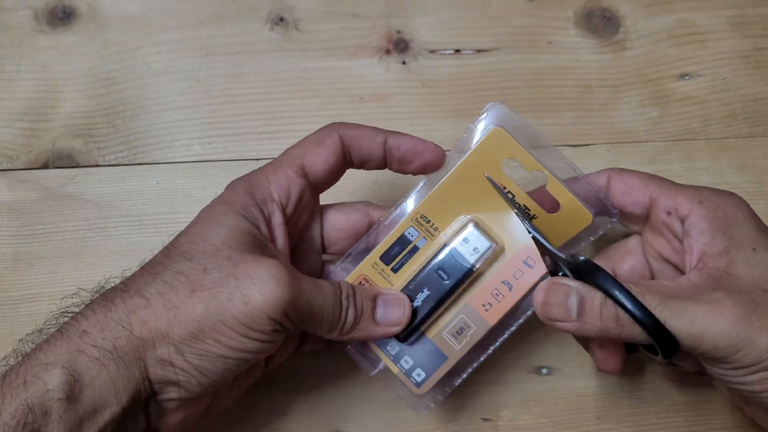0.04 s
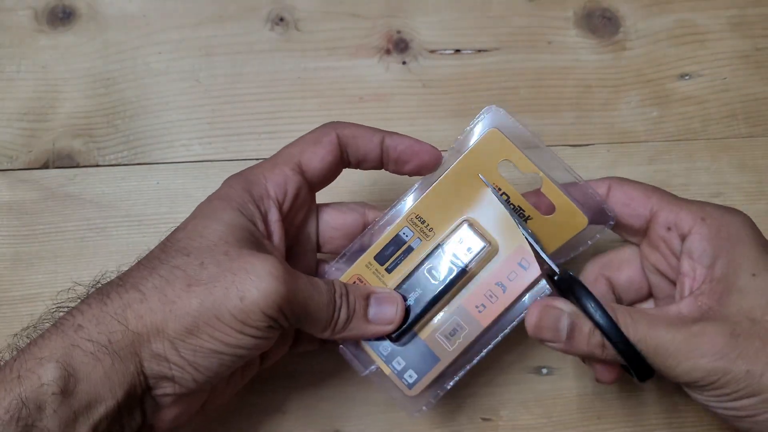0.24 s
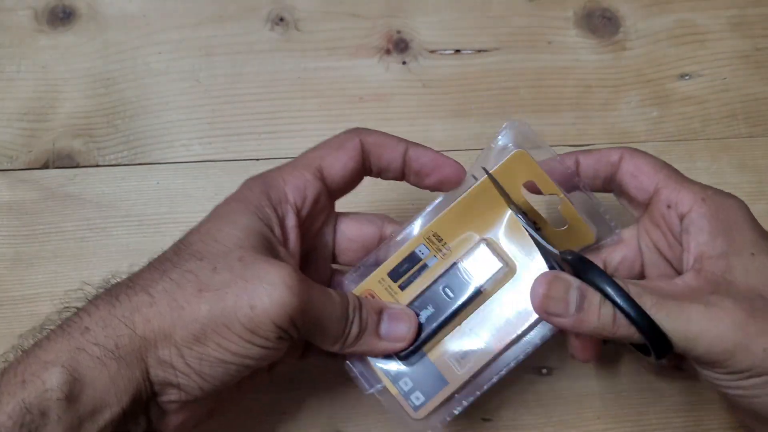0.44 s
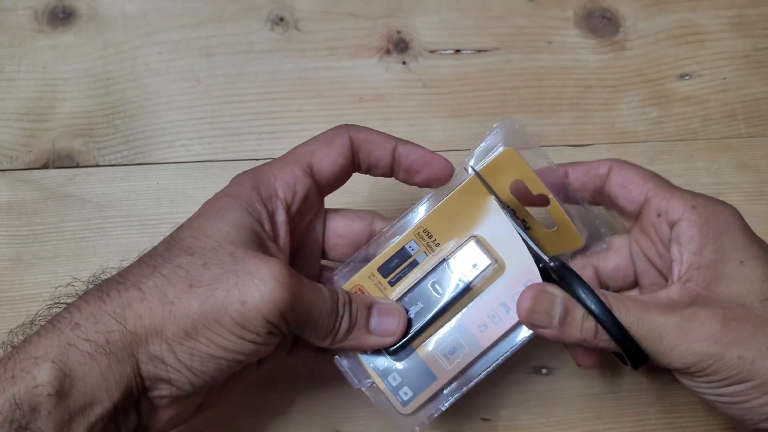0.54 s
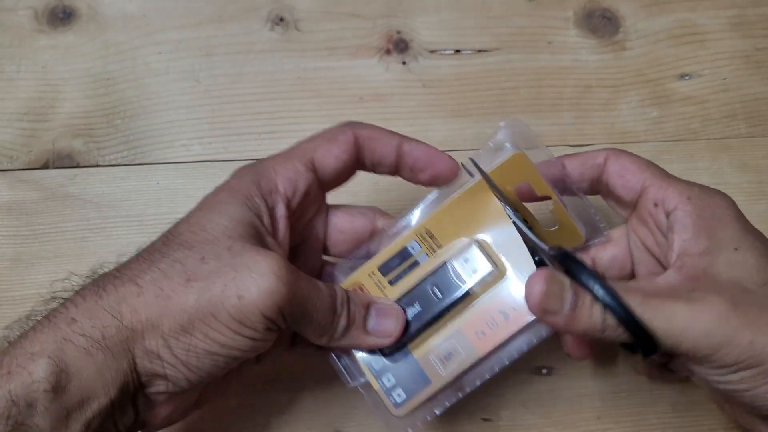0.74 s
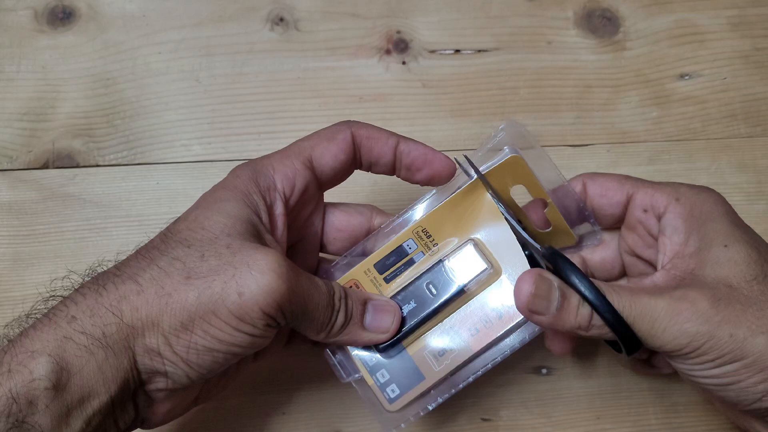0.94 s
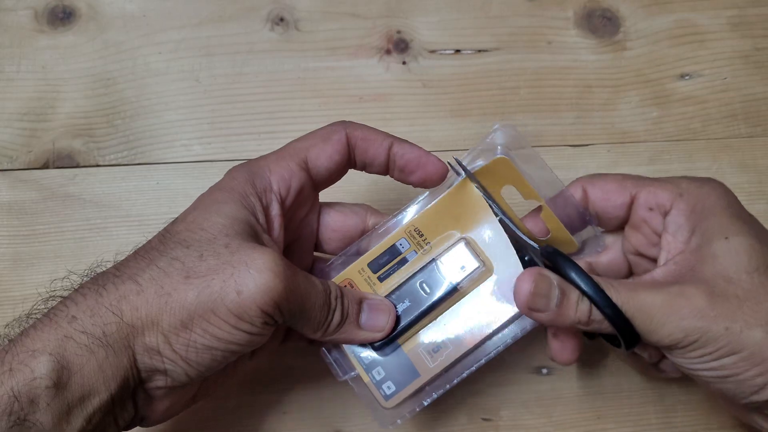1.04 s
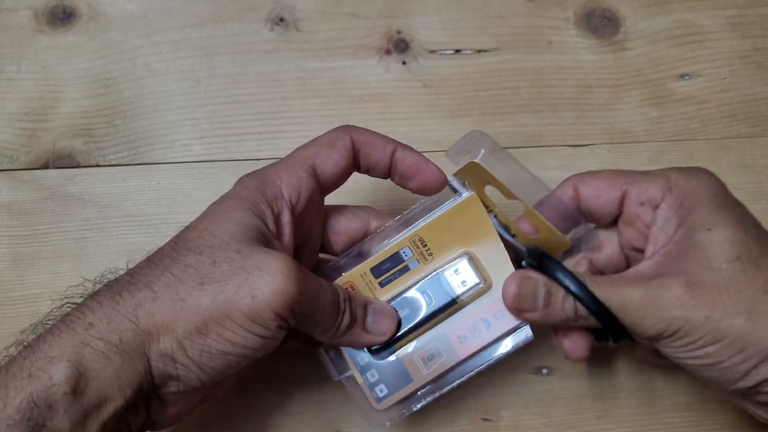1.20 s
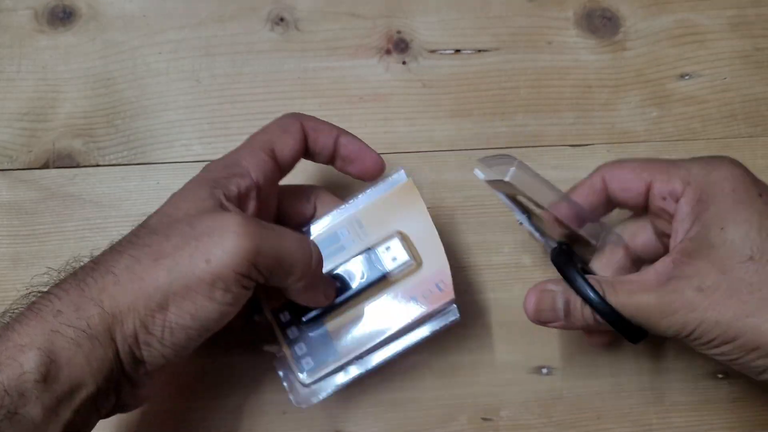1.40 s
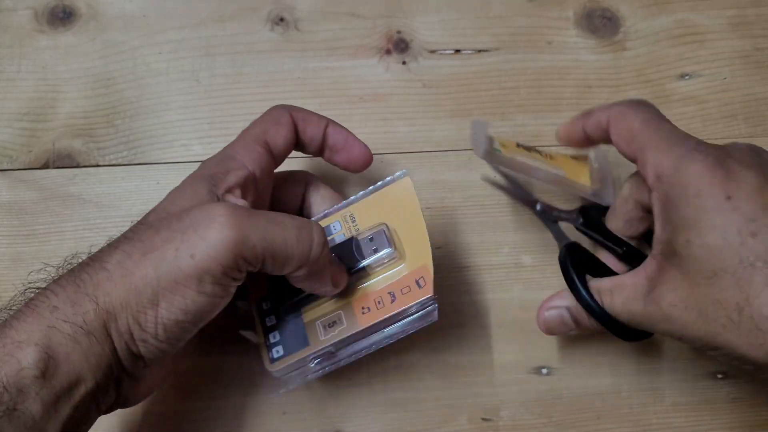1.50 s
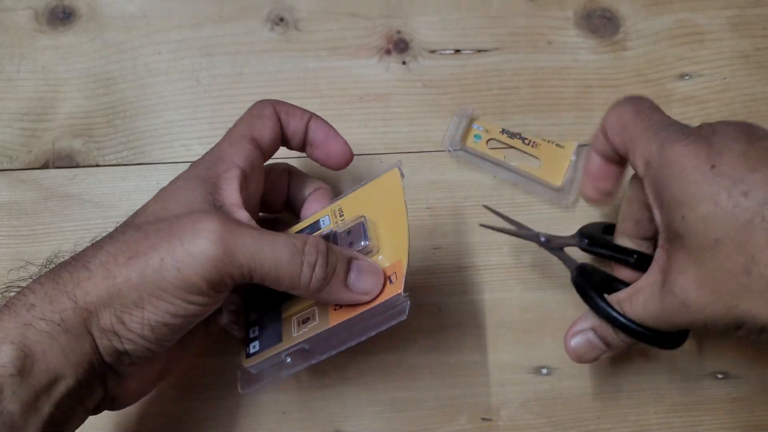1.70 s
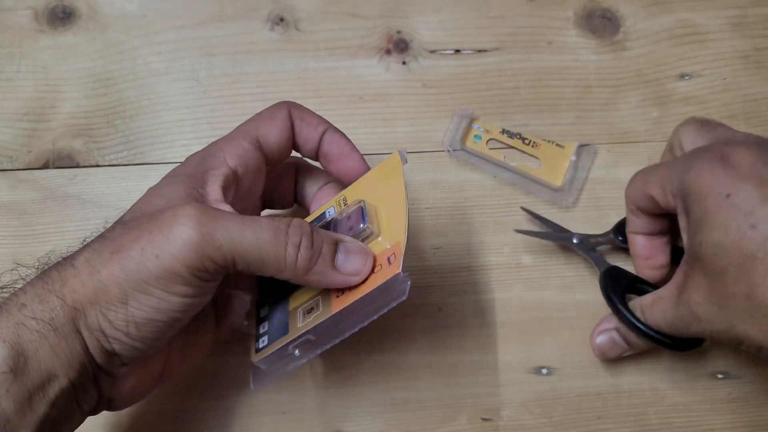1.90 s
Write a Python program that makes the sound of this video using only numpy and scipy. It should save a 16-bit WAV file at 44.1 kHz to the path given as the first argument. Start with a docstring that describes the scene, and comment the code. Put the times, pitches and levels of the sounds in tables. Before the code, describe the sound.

Scissors cut stiff clear plastic packaging with sharp cracks, snapping shut before the offcut clacks onto wood.

```python
"""Small room: scissors cut the top off a stiff plastic blister pack, close above a wooden table.
Four cracks are millisecond runs of filtered noise grains, with damped modes of the sheet and a room tail.
The blades snap shut with damped steel modes, a noise shiver and a low jolt; the offcut clacks and thuds.
Noise bursts make the pack's ticks and knocks, swelling noise the scrapes, strains and squeak.
A faint rustle, a low noise rumble and a steady hum lie beneath."""
import sys
import numpy as np
from scipy import signal
from scipy.fft import rfft, irfft
from scipy.io import wavfile
from scipy.ndimage import uniform_filter1d

SR = 44100
rng = np.random.default_rng(int(sys.argv[2]) if len(sys.argv) > 2 else 0)


def bounce(signal):
    """Save signal as a 16-bit WAV file at the path given by the first command-line argument."""
    frames = np.transpose(np.atleast_2d(signal))
    limited = np.clip(frames, -1, 1)
    pcm = np.round(limited * 32767).astype(np.int16)
    wavfile.write(sys.argv[1], SR, pcm)


N = 85995  # length in samples

# Spectrum of the far edge parting, shared with the shiver of the freed sheet: f/Hz, density/dB
FAR_EDGE_SPECTRUM = [(200, -8.5), (500, -8.5), (950, -2.5), (1500, -12.5), (2300, 3.5), (2900, -4.5),
                     (3800, -1), (5000, -3.5), (7000, -1.5), (10000, -1.5), (13000, 2), (15500, -6.5)]
# Spectrum of stressed plastic, for ticks and strains: f/Hz, density/dB
TICK_SPECTRUM = [(300, -13.5), (1000, 15), (2500, -9), (4500, -2.5), (8000, -0.5), (12000, 1.5),
                 (15500, -9)]


def amp(db):
    """Level as a logarithm: 20 dB is a factor of ten in amplitude."""
    return 10 ** (np.asarray(db) / 20)


def evened(x):
    """Power normalisation: scales to rms 1 over both channels together."""
    return x / np.sqrt(np.mean(x ** 2) + 1e-20)


def read(points, hz):
    """Logarithmic pitch scale: interpolates a table linearly along log frequency."""
    f, value = np.transpose(points)
    return np.interp(np.log(hz + 1), np.log(f), value)


def add(mix, s, sound):
    """Superposition: sums a stereo sound into the mix from time s (s)."""
    start = max(round(s * SR), 0)
    part = mix[:, start:][:, :sound.shape[1]]
    part += sound[:, :part.shape[1]]


def colour(x, spectrum, size=4096):
    """Minimum-phase filtering: a causal response whose phase follows from its log gain."""
    hz = abs(np.fft.fftfreq(size, 1 / SR))
    log_gain = np.log(amp(read(spectrum, hz)))
    response = np.exp(np.conj(signal.hilbert(log_gain)))
    taps = np.fft.ifft(response).real[:size // 2]
    return signal.fftconvolve(x, taps[None], axes=1)[:, :x.shape[1]]


def pair(count, likeness):
    """Interchannel coherence: two noise channels with correlation likeness."""
    a, b = rng.standard_normal((2, count))
    c = np.clip(likeness, -1, 1)
    common = np.sqrt((1 + c) / 2) * a
    opposed = np.sqrt((1 - c) / 2) * np.array([b, -b])
    return common + opposed


def grains(count, spread_db, likeness, size=12):
    """Intermittent fracture: noise in grains of size samples with very uneven strength."""
    deviation = np.clip(rng.standard_normal(count // size + 1), -2, 2)
    strength = amp(spread_db * deviation)
    return pair(count, likeness) * np.repeat(strength, size)[:count]


def burst(spectrum, rise_s, decay_s, likeness, tilt_db=0, count=2048, size=70):
    """Broadband impulsive excitation: fractures build up, die within milliseconds and are coloured."""
    grain_db = 3.5  # spread of grain strength
    t = np.arange(count) / SR
    shape = np.minimum(t / rise_s, 1) * np.exp(-np.maximum(t - rise_s, 0) / decay_s)
    fractures = grains(count, grain_db, likeness) * shape
    z = rfft(np.pad(fractures, ((0, 0), (count, count))))
    # dividing by the smoothed spectrum excites all frequencies alike
    power = uniform_filter1d((abs(z) ** 2).mean(0), size)
    flat = irfft(z / np.sqrt(power + 1e-12))[:, count:-count]
    # tilt in dB per octave about 1 kHz
    tilted = [(hz, db + tilt_db * np.log2(hz / 1000)) for hz, db in spectrum]
    x = colour(flat, tilted)
    return evened(x) * np.sqrt(.005 * SR / count)  # energy of rms 1 lasting 5 ms


def ring(modes, phase_spread):
    """Modal decay: damped sinusoids with a random phase (spread in rad) in each channel."""
    t = np.arange(SR // 2) / SR
    out = np.zeros((2, len(t)))
    for hz, db, t60 in modes:
        phase = phase_spread * rng.standard_normal((2, 1))
        out += amp(db - 60 * t / t60) * np.sin(2 * np.pi * hz * t + phase)
    return out


def room(x):
    """Reverberation: weak scatter from hands and table, then a dense tail from the walls."""
    # Reverberation time by frequency: f/Hz, t60/s
    reverberation = [(250, 0.18), (700, 0.19), (1800, 0.23), (4600, .2), (12000, 0.17)]
    wall_s, early_db = .0095, -5  # arrival of the walls; gain of the scatter before it
    t = np.arange(SR // 2) / SR
    taps = pair(len(t), .1) * np.where(t < wall_s, amp(early_db), 1) * (t > .002)
    hz, when, z = signal.stft(taps, SR, nperseg=256)
    decay = amp(-60 * when / read(reverberation, hz)[:, None])
    tail = signal.istft(z * decay, SR, nperseg=256)[1]
    unit_tail = tail / np.linalg.norm(tail[0])  # left response has unit energy
    return signal.fftconvolve(x, unit_tail, axes=1)[:, :N]


def swells(rows):
    """Gaussian envelopes: a smooth rise and fall for each stroke."""
    t = np.arange(N) / SR
    return sum(amp(db) * np.exp(-.5 * ((t - s) / width) ** 2) for s, width, db in rows)


def cuts():
    """Brittle fracture: four cracks of the sheet, each exciting its modes and the room."""
    # Cracks under the blades: t/s, level/dB, rise/s, decay/s, room send/dB, left-right/dB, sheet ring/dB
    cracks = [(0.3358, -33, 0.0029, .0012, -11.5, 4, -50), (0.4204, -16.5, .0026, 0.0016, -7.5, 2.5, -25),
              (.6608, -27, 0.00021, 0.0019, -8, 2, -46), (1.1830, -15.5, .0015, 0.0014, -3, 4, -35)]
    # Crack spectra, each f/Hz, density/dB: gripping, through the rim, splitting on
    grip_spectrum = [(200, -12), (330, 2), (600, -9), (820, 12.5), (1200, -8.5), (2200, -7), (3100, -7),
                     (4000, -2.5), (5200, 0), (6500, -21), (10000, -10.5), (15000, -20)]
    rim_spectrum = [(150, -10.5), (260, 0), (550, 1.5), (900, -8), (1300, -2.5), (1750, -7.5), (2100, -8.5),
                    (2700, -5), (3450, -3.5), (5000, -6), (8000, -7), (10000, -13.5), (12000, -6.5),
                    (15500, -14)]
    split_spectrum = [(250, -4), (500, -2), (750, 3), (1000, 10.5), (1500, 1), (2800, -5.5), (4200, -3.5),
                      (5500, 3.5), (7500, -2), (11000, 4), (15000, 2)]
    # Modes of the stiff sheet: f/Hz, level/dB, t60/s
    sheet_modes = [(843, -1.5, 0.041), (1022, -7, .07), (1733, 1, 0.051), (3140, -5, .08), (3490, 1, 0.026),
                   (4260, -6, .04)]
    spectra = (grip_spectrum, rim_spectrum, split_spectrum, FAR_EDGE_SPECTRUM)
    near, sent = np.zeros((2, 2, N))
    for (s, db, rise, decay, room_db, pan_db, ring_db), spectrum in zip(cracks, spectra):
        crack = amp(db) * burst(spectrum, rise, decay, likeness=.2)
        add(near, s, crack * amp([[pan_db / 2], [-pan_db / 2]]))
        add(near, s + rise, amp(ring_db) * ring(sheet_modes, .4))
        add(sent, s, crack * amp(room_db))
    return near + room(sent)


def blades_shut():
    """Impact and release: the steel rings, the freed sheet shivers and a low jolt follows."""
    # Modes of the steel blades: f/Hz, level/dB, t60/s
    blade_modes = [(894, -11, 0.32), (1065, -10, .22), (2250, -4.5, 0.2), (2334, 0, 0.14),
                   (3639, -11.5, 0.14), (4240, -7.5, .18), (6360, -11, 0.12), (8800, -7, .15)]
    shut_s, blades_db = 1.184, -31
    shiver_s, shiver_db, shiver_rise_s, shiver_t60 = 1.191, -19.5, .0026, .19
    jolt_hz, jolt_db, jolt_s, jolt_pan_db = 50, -28.5, .0066, 7  # jolt_s: time to the envelope peak
    out = np.zeros((2, N))
    t = np.arange(SR // 4) / SR
    add(out, shut_s, amp(blades_db) * ring(blade_modes, .9))
    noise = evened(colour(pair(len(t), likeness=-.1), FAR_EDGE_SPECTRUM))
    fade = np.minimum(t / shiver_rise_s, 1) * np.exp(-np.log(1000) * t / shiver_t60)
    add(out, shiver_s, amp(shiver_db) * noise * fade)
    envelope = t / jolt_s * np.exp(1 - t / jolt_s)
    jolt = amp(jolt_db) * envelope * np.sin(2 * np.pi * jolt_hz * t)
    add(out, shut_s, jolt * amp([[jolt_pan_db / 2], [-jolt_pan_db / 2]]))
    return out


def offcut():
    """Impact excitation: the strip clacks on the wood, whose modes answer with a short thud."""
    # Landing and tipping over: t/s, clack level/dB, brightness/(dB per octave), thud level/dB
    drops = [(1.6468, -28.5, 0.5, -26.5), (1.718, -40.5, -7, -58), (1.728, -46, -2.5, -33)]
    # Clack spectrum: f/Hz, density/dB
    clack_spectrum = [(300, -2), (700, -2), (950, 3.5), (1250, -8), (1550, 2.5), (2400, -1.5), (3050, 4),
                      (3900, -7.5), (5200, -0.5), (8000, -6), (11000, -16), (15500, -15.5)]
    # Modes of the wooden table: f/Hz, level/dB, t60/s
    table_modes = [(279, -10.5, 0.21), (456, -2, 0.062), (490, -14.5, 0.11)]
    out = np.zeros((2, N))
    for s, clack_db, tilt_db, thud_db in drops:
        clack = burst(clack_spectrum, rise_s=.00056, decay_s=.0021, likeness=.34, tilt_db=tilt_db)
        add(out, s, amp(clack_db) * clack)
        add(out, s, amp(thud_db) * ring(table_modes, .43))
    return out


def knocks():
    """Hollow-body impact: dull knocks of the pack on fingers and blades, with a weak room."""
    # Knocks: t/s, level/dB, brightness/(dB per octave)
    knock_events = [(0.2877, -50, -4.5), (.606, -42.5, 5.5), (.626, -47.5, 1.5), (0.644, -45, 2.5),
                    (0.651, -47.5, 5), (.819, -46, -5.5), (1.386, -54.5, 5.5), (1.502, -46, 7),
                    (1.5079, -40, 3), (1.5302, -38.5, 0), (1.551, -43.5, -1)]
    # Knock spectrum: f/Hz, density/dB
    knock_spectrum = [(250, -17), (600, -0.5), (1050, 7), (1450, 0.5), (1850, 0.5), (2600, -9), (4500, -14),
                      (8000, -29), (15000, -29)]
    out = np.zeros((2, N))
    for s, db, tilt_db in knock_events:
        knock = burst(knock_spectrum, rise_s=.0005, decay_s=.0016, likeness=.46, tilt_db=tilt_db)
        add(out, s, amp(db) * knock)
    return out + amp(-12) * room(out)


def ticks():
    """Sudden stress release: the strained plastic gives short, bright ticks."""
    # Ticks: t/s, level/dB
    tick_events = [(0.044, -58), (0.2136, -51), (.227, -56), (.236, -50), (0.288, -50.5), (0.3525, -45),
                   (0.3633, -50), (0.369, -62), (.577, -59), (0.59, -57), (0.6172, -51), (.787, -55),
                   (0.944, -58), (1.0205, -50.5), (1.047, -56.5), (1.149, -61), (1.339, -53), (1.3943, -48),
                   (1.409, -57), (1.4735, -52.5), (1.484, -60), (1.492, -52), (1.523, -46), (1.590, -55.5),
                   (1.777, -71.5)]
    out = np.zeros((2, N))
    for s, db in tick_events:
        add(out, s, amp(db) * burst(TICK_SPECTRUM, rise_s=.00022, decay_s=.0022, likeness=.1))
    return out


def rubbing():
    """Sliding friction: grainy scrapes, strains and a squeak over the rustle of fingers on plastic."""
    # Blades rubbing along the sheet: middle t/s, width/s, level/dB
    rubs = [(.003, 0.002, -46.5), (.134, 0.0034, -46), (.262, 0.0035, -51), (.292, .004, -54),
            (.605, 0.023, -53.5), (.820, 0.016, -47), (1.105, .03, -75), (1.402, 0.025, -66.5),
            (1.505, 0.013, -57)]
    # Sheet starting to give just before it parts: middle t/s, width/s, level/dB
    strains = [(.418, 0.001, -29), (.6425, 0.0012, -45), (1.182, .0018, -36.5)]
    # Level of the faint rustle: t/s, level/dB
    handling = [(0, -58), (.3, -62.5), (.7, -56.5), (.9, -61.5), (1.15, -58.5), (1.4, -61.5), (1.6, -59.5),
                (1.8, -62.5), (1.95, -69)]
    # Spectra of scrape, squeak and rustle, each f/Hz, density/dB
    rub_spectrum = [(300, -6), (900, 20), (2000, 1.5), (4000, 6), (7000, 0), (11000, -0.5), (15500, -5)]
    squeak_spectrum = [(600, -6), (1000, 3), (1500, -4), (1950, -6), (2070, 6), (2200, -16), (3000, -14),
                       (3500, -4), (4500, -40), (15000, -44)]
    rustle_spectrum = [(400, 5), (1000, 7.5), (2000, 1), (4000, -7), (8000, -12), (15500, -16.5)]
    grain_db = 2.5  # spread of grain strength
    squeak_s, squeak_width_s, squeak_db = .764, .063, -54.5
    t = np.arange(N) / SR
    scrape_noise = evened(colour(grains(N, grain_db, likeness=.24, size=40), rub_spectrum))
    scrape = swells(rubs) * scrape_noise
    strain = swells(strains) * evened(colour(grains(N, grain_db, likeness=.3), TICK_SPECTRUM))
    squeak_noise = evened(colour(pair(N, likeness=.19), squeak_spectrum))
    squeak = swells([(squeak_s, squeak_width_s, squeak_db)]) * squeak_noise
    rustle_level = amp(np.interp(t, *np.transpose(handling)))
    rustle = rustle_level * evened(colour(pair(N, likeness=.15), rustle_spectrum))
    return scrape + strain + squeak + rustle


def rumble():
    """Stationary background: coherent low noise of slowly varying level plus a pure-tone hum."""
    # Spectrum of the room noise: f/Hz, density/dB
    low_spectrum = [(25, -29), (38, -1.5), (60, -1.5), (90, 4), (140, 3.5), (190, -4), (240, 3), (285, 2.5),
                    (370, -9), (480, -12.5), (700, -16), (1200, -27.5), (2000, -32), (4000, -72),
                    (8000, -69.5), (15500, -63.5)]
    # Level of the room noise: t/s, level/dB
    low_level = [(0, -40.5), (.3, -40.5), (.85, -40), (1.15, -39.5), (1.33, -45), (1.65, -45),
                 (1.95, -43.5)]
    hum_hz, hum_db = 49.23, -48.5  # rms level
    t = np.arange(N) / SR
    noise = evened(colour(pair(N, likeness=.88), low_spectrum, size=16384))
    level = amp(np.interp(t, *np.transpose(low_level)))
    hum = amp(hum_db) * np.sqrt(2) * np.sin(2 * np.pi * hum_hz * t)
    return level * noise + hum


def scene():
    """Superposition: all sources add, the small ones sharing one room response."""
    small = ticks() + rubbing() + offcut()
    return cuts() + blades_shut() + knocks() + small + amp(-7) * room(small) + rumble()


def record(dry):
    """Saturation and band-limiting: rounds off the highest peaks, then low-passes."""
    ceiling, edge_hz = 1.0, 15800
    rounded = ceiling * np.tanh(dry / ceiling)
    low_pass = signal.firwin(255, edge_hz, window=("kaiser", 9), fs=SR)
    return signal.oaconvolve(rounded, low_pass[None], "same")


dry = scene()
out = record(dry)
bounce(out)
```